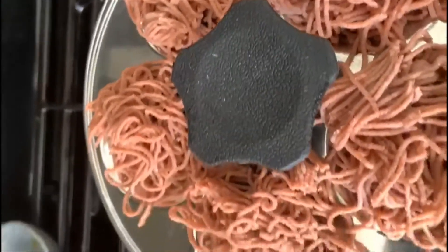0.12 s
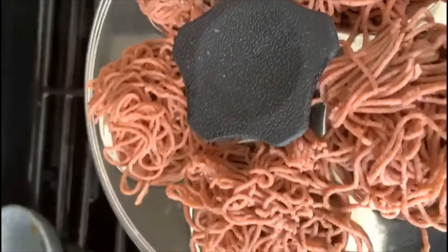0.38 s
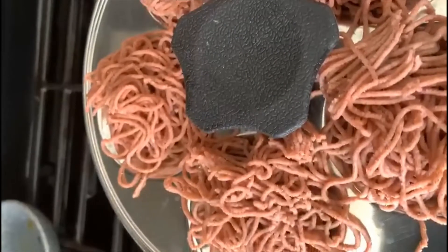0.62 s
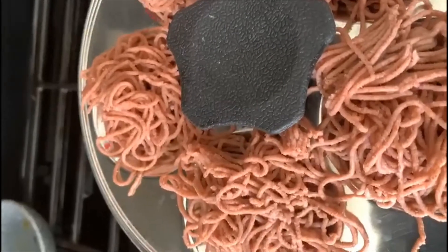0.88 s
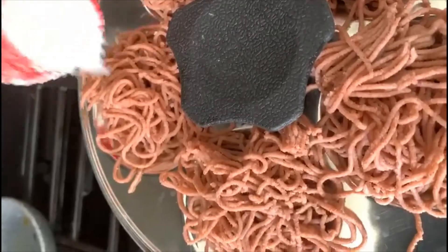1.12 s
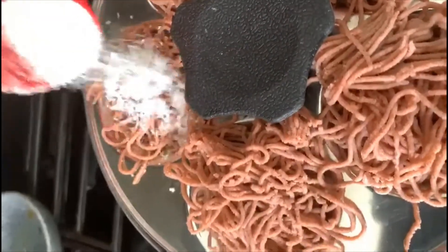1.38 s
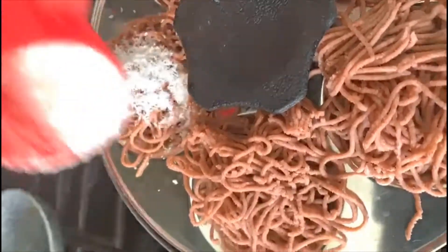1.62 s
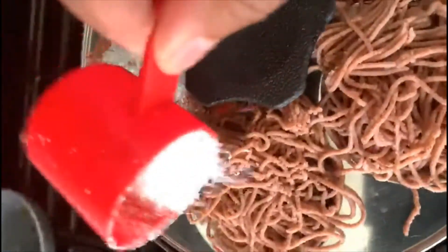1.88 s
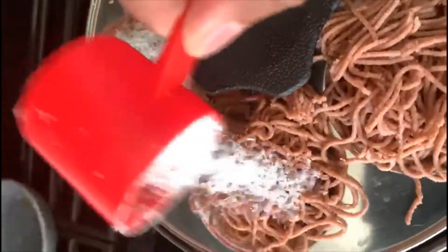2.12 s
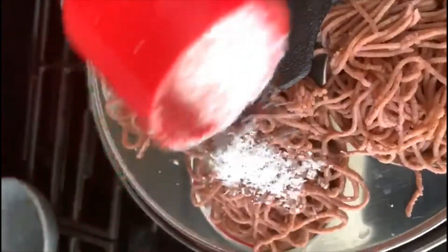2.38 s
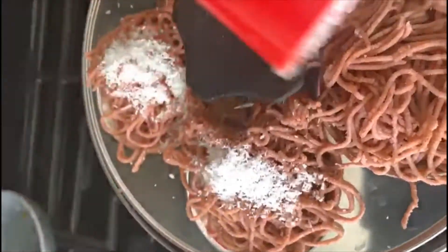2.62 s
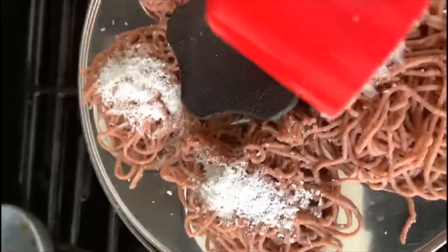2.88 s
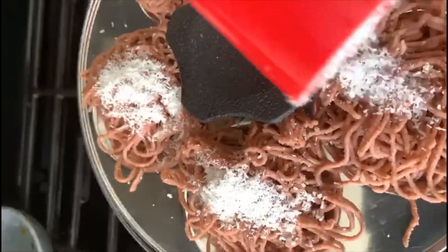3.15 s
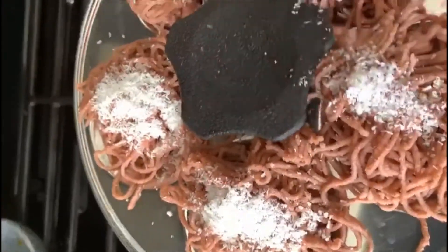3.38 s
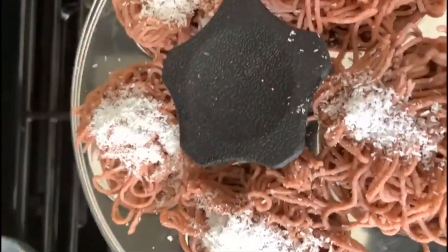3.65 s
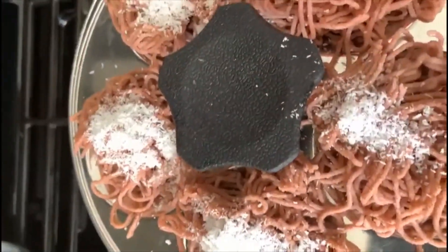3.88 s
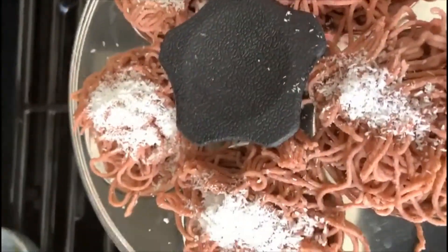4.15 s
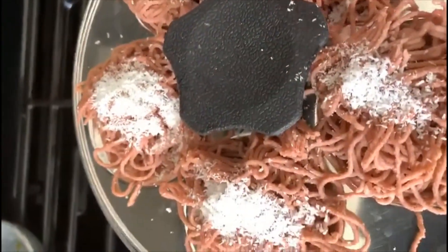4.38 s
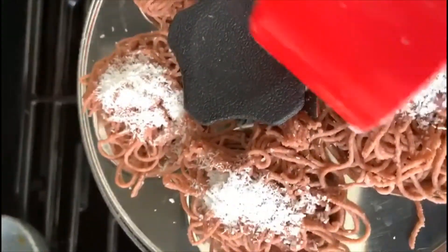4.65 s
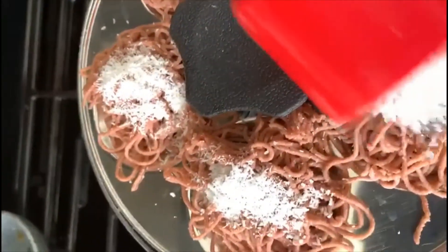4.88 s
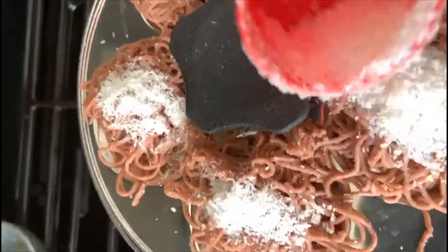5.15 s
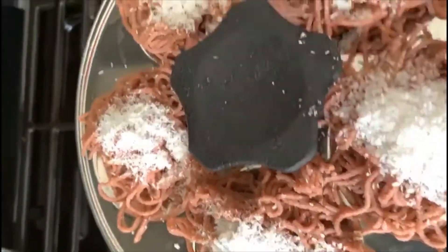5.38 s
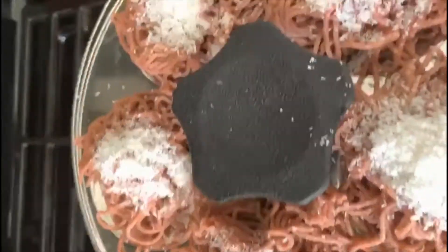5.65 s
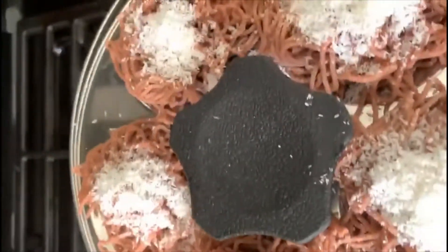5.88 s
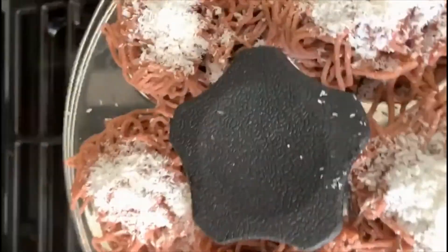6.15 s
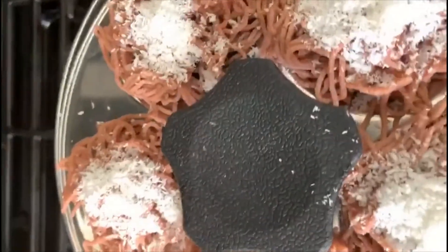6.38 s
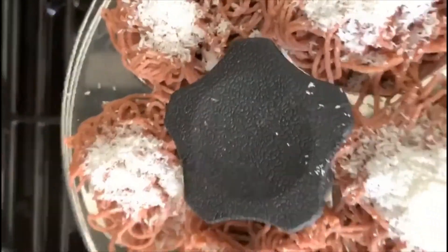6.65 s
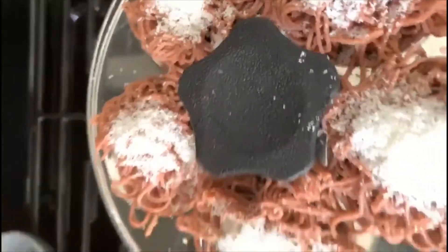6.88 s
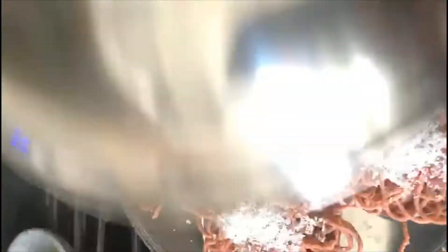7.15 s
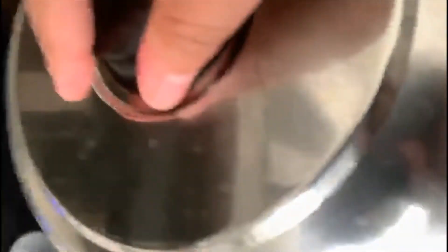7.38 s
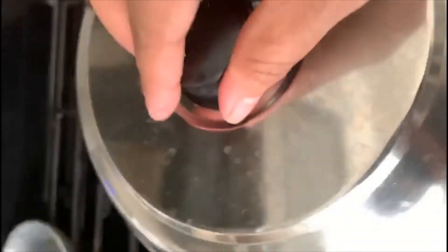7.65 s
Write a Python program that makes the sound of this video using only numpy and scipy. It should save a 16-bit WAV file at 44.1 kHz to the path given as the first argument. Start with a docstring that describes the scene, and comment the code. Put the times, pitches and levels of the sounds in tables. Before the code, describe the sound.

A close stereo microphone hears continuous churning bubbles in a hollow metal pot, soft uneven flame roar beneath and patchy steam hiss above. Larger steam pockets pop dully at irregular moments. After a long steady stretch comes one short hollow clink with chatter, leaning slightly left, then near the end a rapid bright lid clatter with woody-low thumps, slightly right, and a short kitchen echo.

```python
"""Water boils in an open steel steamer close to a two-port microphone: bubbles and churning water gurgle in the
hollow of the pot, and bigger steam pockets burst with a thud. Steam hisses, lifted where the steel resonates.
Something small clinks and chatters on metal, as a short hollow ring under a crack of noise. Then a lid shades
the pot and clatters on the rim: ringing modes, a wash of noise and thuds. The gas flame below rumbles as lumpy
low noise with soft puffs, and the kitchen answers the clinks and the lid."""
import sys
import numpy as np
from scipy import signal
from scipy.fft import rfft, irfft, next_fast_len
from scipy.io import wavfile
from scipy.ndimage import uniform_filter1d, map_coordinates

SR = 44100
rng = np.random.default_rng(int(sys.argv[2]) if len(sys.argv) > 2 else 0)


def decibels_to_gain(level_db):
    """Convert a level in decibels to a linear amplitude gain (20 dB per decade)."""
    exponent = np.asarray(level_db, float) / 20
    return 10 ** exponent


def wrap_up_sound(samples):
    """Save the sound to the file named by the first command line argument, as 16-bit audio."""
    columns = np.atleast_2d(samples).T
    # keep every value between -1 and 1, then stretch to whole-number steps
    tamed = np.clip(columns, -1, 1)
    steps = np.round(tamed * 32767).astype(np.int16)
    wavfile.write(sys.argv[1], SR, steps)


N = 342657

# How hard the water boils: (time [s], gurgle level [dB])
BOIL_STRENGTH = [(0, -50), (1.9, -50.5), (2.9, -50), (3.5, -51.5), (5.1, -51.5), (6.2, -48.5), (7.3, -50),
                 (7.6, -45.5)]
# Hollow of the pot while open: (pitch [Hz], width [Hz], level [dB])
OPEN_HOLLOW = [(330, 67.5, -5), (470.5, 47.4, 0), (667, 123, -10.5), (934, 139, -5.5), (1565, 119, -2),
               (1799, 76, -7)]
# The same hollow when shaded: (pitch [Hz], width [Hz], level [dB])
SHADED_HOLLOW = [(340, 260, -8.5), (448, 200, -5.5), (700, 130, -14.5), (1103, 76, -5.5),
                 (1580, 720, -17.5), (1750, 180, -12)]
# Bursting steam pockets: (time [s], strength [dB], overtone against the low tone [dB])
BURSTS = [(0.1204, -39, 0), (0.5874, -19.5, -10.5), (0.8434, -37, -2), (1.1904, -33, -11),
          (1.6464, -45, 7.5), (1.8614, -30.5, -6.5), (2.1874, -25.5, -15), (2.6404, -36, 4.5),
          (2.9224, -27, -17), (3.1654, -22, -1), (3.2204, -22.5, -22.5), (3.2834, -22.5, -5),
          (4.1124, -24.5, -23), (5.1784, -26, -7), (6.0834, -25.5, -13.5), (6.2344, -20.5, -6),
          (6.7454, -25.5, -10), (7.0564, -24, -18), (7.1424, -33, 6), (7.2854, -30, -19.5),
          (7.4084, -29, -4)]
# Tone colour of the steam: (pitch [Hz], relative level per Hz [dB])
STEAM_COLOUR = [(1200, -21), (2000, -3.5), (2500, -7.5), (3200, -3.5), (4400, -1), (5150, -9), (5800, 0.5),
                (6900, -4), (7600, -13), (8400, -4.5), (9350, -6), (9700, -23.5), (11400, -18),
                (12000, -44)]
# Narrow modes of the steel: (pitch [Hz], width [Hz], lift over the hiss [dB])
STEEL_MODES = [(2305, 120, 6.5), (2677, 43, 9), (2892, 81, 9), (3810, 130, 9), (3900, 60, 10.5),
               (4440, 32, 3.5), (4440, 47, 4), (5550, 92, 12.5), (5700, 84, 11), (6470, 64, 9.5),
               (6870, 80, 9), (7313, 90, 16.5), (10400, 290, 11.5)]
# Where reflections cancel in the hiss: (pitch [Hz], width [Hz], change [dB])
HISS_DIPS = [(2535, 120, -4), (3210, 250, -6), (3927, 58, -29.5), (5740, 80, -15), (6330, 74, -13),
             (7060, 100, -15), (7700, 60, -3), (7740, 60, -12), (8300, 67, -16)]
# Contacts of lid and rim: (time [s], ring strength [dB], thud strength [dB])
LID_CONTACTS = [(7.5917, -23.5, -21), (7.604, -31.5, -31), (7.644, -25, -11), (7.684, -56, -29),
                (7.695, -33.5, -23.5), (7.7416, -27, -5.5), (7.756, -25, -12.5)]
# Ringing modes of the lid: (pitch [Hz], level [dB], time to fall 60 dB [s])
LID_MODES = [(1926, -2.5, 0.072), (2550, -9, 0.073), (3455, -7, .4), (4134, -3.5, 0.13), (4250, 0, 0.093),
             (4530, 0.5, 0.093), (5000, -1, 0.074), (5362, -1, .16), (6140, 4, 0.077), (6320, -5, 0.18),
             (6470, -8, .1), (6650, -1, 0.071), (6950, -4.5, 0.11), (7240, -3, 0.11), (7701, -3.5, 0.22),
             (7970, -5, 0.12), (8300, -5, 0.15), (8900, -3, 0.11), (9700, -7, 0.13), (10600, -4, .07),
             (10600, -10, .12), (11088, -8.5, 0.24), (11343, -8, 0.11), (11460, -5.5, .15)]
# Air and pot under the lid: (pitch [Hz], level [dB], time to fall 60 dB [s])
THUD_MODES = [(335, -6, 0.027), (456, -6.5, 0.039), (681, 1, 0.022), (927, 2, 0.021), (1216, 2, 0.027),
              (1530, -10, 0.028), (1870, 0, 0.011)]
# A graze, the blow and two bounces: (time [s], strength [dB])
CLINK_TOUCHES = [(5.711, -21), (5.7164, 0), (5.763, -14), (5.9496, -22)]
# Hollow ring of a clink: (pitch [Hz], level [dB], time to fall 60 dB [s])
CLINK_RING = [(1264, -11.5, 0.025), (1488, -5, 0.024), (1565, 3.5, 0.021), (1762, -15, 0.098),
              (1980, -15.5, 0.034), (2250, -33, 0.057)]
# Tone colour of the clink's crack: (pitch [Hz], relative level per Hz [dB])
CRACK_COLOUR = [(700, -22), (2000, 6.5), (3500, 2), (4500, -6), (6700, 5.5), (8500, -1), (11000, -9.5),
                (13000, -33)]
# Tone colour of the flame's roar: (pitch [Hz], relative level per Hz [dB])
ROAR_COLOUR = [(12, -50), (20, -24), (54, -2), (97, -8.5), (182, -7.5), (210, -14), (260, -7.5), (340, -17),
               (570, -120)]
# Soft puffs of the flame: (time [s], strength [dB])
PUFFS = [(0.708, -44.5), (4.26, -41), (4.978, -41), (5.406, -43.5), (7.172, -41)]
# Echo of the room: (pitch [Hz], time to fall 60 dB [s])
ROOM_FADE = [(300, 0.44), (1600, 0.51), (7000, 0.27)]
# How alike a spread-out source is at the two ports: (pitch [Hz], likeness [1 = the same])
PORT_LIKENESS = [(60, 0.97), (400, 0.92), (700, 0.7), (1600, 0.99), (2400, 0.19), (3500, 0.78),
                 (4600, 0.99), (11000, 0.93)]
# Shading by the housing: (pitch [Hz], left minus right [dB])
PORT_SHADING = [(60, -0.5), (140, -2.5), (350, -3.5), (840, -4.5), (2040, -1), (4920, 0.5), (11900, -0.5)]

# Smaller steam pockets at random moments
STRAY_COUNT, STRAY_DB, STRAY_SCATTER_DB, STRAY_OVERTONE_DB = 30, -39, 0.5, -7
HISS_DB, HISS_FOLLOWS = -54.5, 0.28  # base level; share of the boil's swings that moves the hiss
LID_MUFFLES_DB = 2  # hiss lost under full shade
LID_ARRIVES_S, LID_SWEEP_S = 7.19, 0.089  # middle and spread of the lid's sweep
EARLY_SHADE = 0.24  # share of the shaded colour already heard before the lid arrives (0 to 1)
# The lid rocks and touches once more after each contact
REBOUND_S, REBOUND_RING_DB, REBOUND_THUD_DB = 0.008, -4, -12
MODES_UNDER_DB = 1.5  # scales the single modes down beside the wash
# Rattle after the blow
CHATTER_COUNT, CHATTER_GAP_S = 10, 0.0105
CHATTER_DB, CHATTER_FADE_DB_PER_S, CHATTER_SCATTER_DB = -22, 180, 4
CRACK_UNDER_DB = 17.5  # scales the crack down beside the ring
BURNER_DB, PUFF_HZ = -53, 53.6
# The phase bends with pitch, so the lag round the housing nears its full size only for short waves
PORT_LAG_S, LAG_FROM_HZ, LAG_BEND_HZ = 0.000227, 2470, 1800


def unit(x):
    """Scales a sound to an rms (average strength) of 1."""
    return x / np.sqrt(np.mean(x ** 2) + 1e-20)


def along(points, hz):
    """Reads a curve of (pitch, value) points on a log pitch axis."""
    f, v = np.transpose(points)
    return np.interp(np.log(hz + 1), np.log(f + 1), v)


def wobble(rate):
    """A smooth random curve with this many knots a second."""
    knots = rng.standard_normal(int(N * rate / SR) + 4)
    return map_coordinates(knots, [np.arange(N) * rate / SR])


def filtered(x, response):
    """Reshapes a sound by a response that depends on pitch."""
    m = next_fast_len(N + SR // 2)
    spectrum = rfft(x, m) * response(np.fft.rfftfreq(m, 1 / SR))
    return irfft(spectrum, m)[..., :N]


def resonances(peaks):
    """Response of several damped resonators, added with alternating signs."""
    def response(f):
        total = 0
        for k, (centre, width, db) in enumerate(peaks):
            damping = 1j * f * width
            total = total + (-1) ** k * decibels_to_gain(db) * damping / (centre ** 2 - f ** 2 + damping)
        return total
    return response


def spread(pair):
    """Mixes two unrelated signals so the ports hear them as alike as PORT_LIKENESS says."""
    def shares(hz):
        angle = np.arccos(np.clip(along(PORT_LIKENESS, hz), -1, 1)) / 2
        return [np.cos(angle), np.sin(angle)]
    mid, side = filtered(pair, shares)
    return np.array([mid + side, mid - side])


def bubbles(s, db, hz, cycles, rise):
    """Each bubble is a short damped tone with a soft start and a pitch that slides up at first."""
    t = np.arange(1024) / SR
    turns = t * hz[:, None]
    envelope = np.exp(-turns / cycles) * (1 - np.exp(-turns))
    slide = 1 + rise * np.minimum(turns, 8) / 8
    tones = decibels_to_gain(db)[:, None] * envelope * np.sin(2 * np.pi * turns * slide)
    at = np.round(s * SR).astype(int)[:, None] + np.arange(len(t))
    return np.bincount(at.ravel(), tones.ravel(), N + SR)[:N]


def struck(s, db, modes, scatter_db, attack, slip):
    """One blow: every mode rings and fades, with a random strength and a phase slip in radians."""
    t, out = np.arange(SR // 2) / SR, np.zeros(N + SR)
    ring = np.zeros(len(t))
    for hz, level, t60 in modes:
        luck, phase_luck = rng.standard_normal(2)
        fade = decibels_to_gain(level + scatter_db * luck - 60 * t / t60)
        ring += fade * np.sin(2 * np.pi * hz * t + slip * phase_luck)
    out[round(s * SR):][:len(t)] = decibels_to_gain(db) * ring * (1 - np.exp(-t / attack))
    return out[:N]


def boil_db():
    """The strength of the boil, sample by sample."""
    s, db = np.transpose(BOIL_STRENGTH)
    return np.interp(np.arange(N) / SR, s, db)


def cover():
    """Share of the shaded colour, rising to one as the lid sweeps over."""
    sweep = 0.5 + 0.5 * np.tanh((np.arange(N) / SR - LID_ARRIVES_S) / LID_SWEEP_S)
    return np.clip(EARLY_SHADE + (1 - EARLY_SHADE) * sweep, 0, 1)


def gurgle():
    """Dense small bubbles over churning water, coloured by the hollow of the pot, which the lid retunes."""
    swarm = []
    for _ in range(2):
        when, strength, size = rng.random((4000, 3)).T
        hz = 280 * 6.54 ** (size ** 0.9)
        # the logarithm makes most bubbles weak and a few strong
        swarm.append(bubbles(when * N / SR, -2.8 * np.log(strength), hz, cycles=1.2, rise=0.14))
    churn = filtered(rng.standard_normal((2, N)), lambda hz: hz > 120)
    water = decibels_to_gain(5.5) * unit(np.array(swarm)) + decibels_to_gain(13) * unit(churn)
    shade = cover()
    open_sound = filtered(water, resonances(OPEN_HOLLOW))
    shaded_sound = filtered(water, resonances(SHADED_HOLLOW))
    pot = (1 - shade) * open_sound + shade * shaded_sound
    unrest_db = 0.41 * wobble(2.99) + 1.15 * wobble(12)
    return decibels_to_gain(boil_db() + unrest_db) * unit(spread(pot))


def big_bubbles():
    """Steam pockets that burst loud enough to stand out: a wide thud that wakes the hollow of the pot."""
    when, strength, tone = rng.random((STRAY_COUNT, 3)).T
    stray_db = STRAY_DB + STRAY_SCATTER_DB * (2 * strength - 1)
    stray_overtone_db = STRAY_OVERTONE_DB + 20 * (tone - 0.5)
    stray = np.c_[when * N / SR, stray_db, stray_overtone_db]
    s, db, overtone_db = np.vstack([BURSTS, stray]).T
    tuning = 1 + 0.06 * rng.standard_normal((len(s), 2))  # pitch varies from pocket to pocket
    low = bubbles(s, db, 455 * tuning[:, 0], cycles=1.23, rise=0.0057)
    upper = bubbles(s, db + overtone_db, 860 * tuning[:, 1], cycles=2.85, rise=0.0065)
    burst = low + upper
    return burst + decibels_to_gain(0.7) * filtered(burst, resonances(OPEN_HOLLOW))


def hiss():
    """Steam noise in patches that deepen towards the treble, lifted by the steel and scattered in the pot."""
    z = signal.stft(rng.standard_normal((2, N)), nperseg=512)[2]
    patches = uniform_filter1d(rng.standard_normal(z.shape[1:]), 8, 0)  # smooth over pitch
    patches = unit(uniform_filter1d(patches, 12, 1))  # smooth over time
    depth_db = np.linspace(1.2, 5, len(patches))[:, None]
    patchy = signal.istft(z * decibels_to_gain(depth_db * patches), nperseg=512)[1][:, :N]

    def colour(hz):
        db = along(STEAM_COLOUR, hz)
        for centre, width, change in [*STEEL_MODES, *HISS_DIPS]:
            db = db + change / (1 + (2 * (hz - centre) / width) ** 2)
        return decibels_to_gain(db)
    steam = filtered(patchy, colour)
    t = np.arange(SR // 10) / SR
    # countless small reflections ripple the spectrum
    walls = rng.standard_normal(len(t)) * decibels_to_gain(-60 * t / 0.05)
    walls = walls / np.linalg.norm(walls)
    steam = steam + decibels_to_gain(-9) * signal.fftconvolve(steam, walls[None], axes=1)[:, :N]
    boil = boil_db()
    swing_db = HISS_FOLLOWS * (boil - boil.mean())
    flutter_db = 0.7 * wobble(7)
    return decibels_to_gain(HISS_DB + swing_db - LID_MUFFLES_DB * cover() + flutter_db) * unit(spread(steam))


def lid():
    """Each contact rings the lid, adds a wash of modes too dense to count, and thumps the pot."""
    t, out = np.arange(N) / SR, np.zeros(N)
    wash = unit(filtered(rng.standard_normal(N), lambda hz: (hz > 2400) * (hz < 11700)))
    rebounds = [(s + REBOUND_S, ring + REBOUND_RING_DB, thud + REBOUND_THUD_DB)
                for s, ring, thud in LID_CONTACTS]
    for s, ring_db, thud_db in [*LID_CONTACTS, *rebounds]:
        after = np.maximum(t - s, 0)
        out += decibels_to_gain(ring_db - 60 * after / 0.067) * (1 - np.exp(-after / 0.0013)) * wash
        out += struck(s, ring_db - MODES_UNDER_DB, LID_MODES, scatter_db=4.0, attack=0.00046, slip=0.81)
        out += struck(s, thud_db, THUD_MODES, scatter_db=2, attack=0.0007, slip=0.7)
    return out


def clinks():
    """A graze, a sharp clink, a dying chatter and two bounces: a short hollow ring under a wide crack."""
    t, out = np.arange(N) / SR, np.zeros(N)
    crack = unit(filtered(rng.standard_normal(N), lambda hz: decibels_to_gain(along(CRACK_COLOUR, hz))))
    timing, strength = rng.standard_normal((2, CHATTER_COUNT))
    since = CHATTER_GAP_S * (np.arange(CHATTER_COUNT) + 1 + 0.21 * timing)
    chatter_db = CHATTER_DB - CHATTER_FADE_DB_PER_S * since + CHATTER_SCATTER_DB * strength
    blow_s = CLINK_TOUCHES[1][0]
    for s, db in [*CLINK_TOUCHES, *zip(blow_s + since, chatter_db)]:
        after = np.maximum(t - s, 0)
        fade = decibels_to_gain(db - CRACK_UNDER_DB - 60 * after / 0.029)
        out += fade * (1 - np.exp(-after / 0.00027)) * crack
        out += struck(s, db, CLINK_RING, scatter_db=0.1, attack=0.0019, slip=0.38)
    return out


def burner():
    """The flame's low roar is noise, lumpy from moment to moment, with a few soft low puffs."""
    roar = filtered(rng.standard_normal((2, N)), lambda hz: decibels_to_gain(along(ROAR_COLOUR, hz)))
    lumps_db = 1.3 * wobble(4) + 1.5 * wobble(10)
    t, puffs = np.arange(N) / SR, np.zeros(N)
    for s, db in PUFFS:
        from_middle = t - s - 0.025
        swell = np.exp(-(from_middle / 0.023) ** 2)
        puffs += decibels_to_gain(db) * swell * np.cos(2 * np.pi * PUFF_HZ * from_middle)
    return decibels_to_gain(BURNER_DB + lumps_db) * unit(spread(roar)) + puffs


def kitchen(x):
    """The room answers a moment later with noise in which each pitch dies at its own speed."""
    hz, t, z = signal.stft(rng.standard_normal((2, SR // 2)), SR, nperseg=256)
    fade = decibels_to_gain(-60 * t / along(ROOM_FADE, hz)[:, None])
    tail = signal.istft(z * fade, SR, nperseg=256)[1]
    # mostly shared by the close ports
    answer = np.sqrt(0.8) * tail[0] + np.sqrt(0.2) * tail[1] * [[1], [-1]]
    answer = answer / np.linalg.norm(tail[0])
    late = np.pad(x, (250, 0))  # samples
    return signal.fftconvolve(late[None], answer, axes=1)[:, :N]


def scene():
    """Adds all sources: the clink leans a little left, the lid and the big bubbles a little right."""
    clink, clatter = clinks(), lid()
    clink_in_room = (clink + decibels_to_gain(-10.0) * kitchen(clink)) * decibels_to_gain([[0.6], [-0.6]])
    lid_in_room = (clatter + decibels_to_gain(-9.5) * kitchen(clatter)) * decibels_to_gain([[-0.3], [0.3]])
    bursts = big_bubbles() * decibels_to_gain([[-1.2], [1.2]])
    return gurgle() + bursts + hiss() + lid_in_room + clink_in_room + burner()


def band_limit(x):
    """A steep low-pass at the top of the band."""
    return signal.sosfilt(signal.butter(12, 11900, fs=SR, output="sos"), x)


def record(dry):
    """The housing delays and shades the two ports differently."""
    half = np.array([[0.5], [-0.5]])  # each port takes half of the difference

    def port_response(hz):
        lead = 2 * np.pi * PORT_LAG_S * (hz - LAG_FROM_HZ * np.tanh(hz / LAG_BEND_HZ))
        return decibels_to_gain(half * along(PORT_SHADING, hz)) * np.exp(1j * half * lead)
    mix = filtered(dry, port_response)
    return band_limit(mix)


dry = scene()
out = record(dry)
wrap_up_sound(out)
```